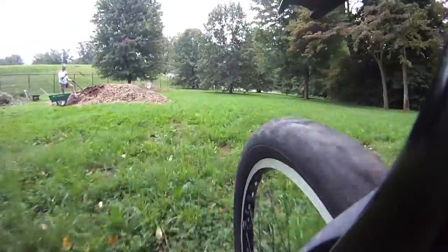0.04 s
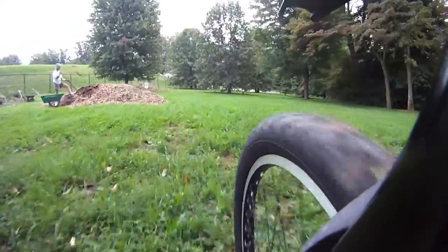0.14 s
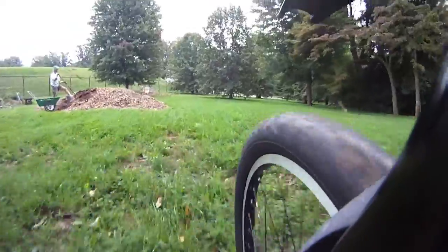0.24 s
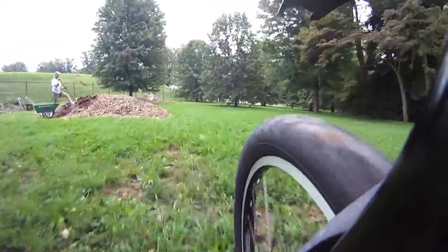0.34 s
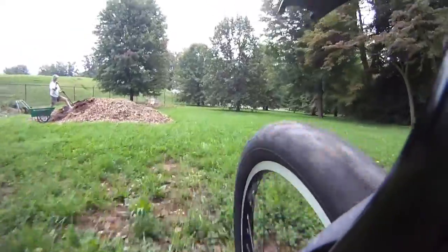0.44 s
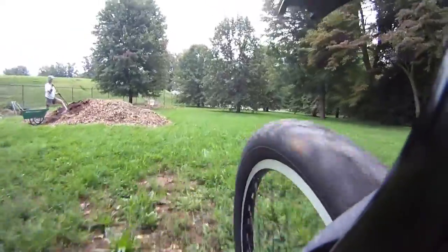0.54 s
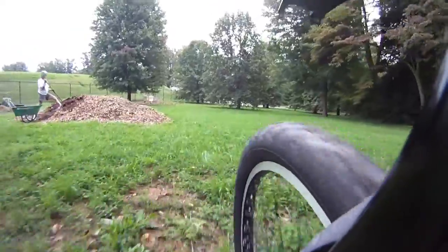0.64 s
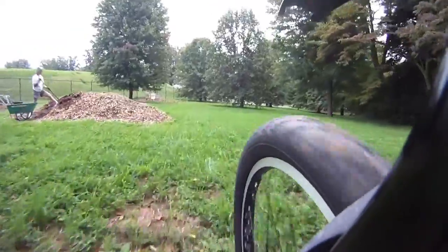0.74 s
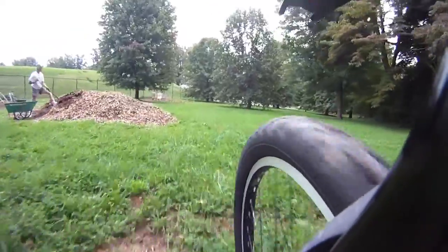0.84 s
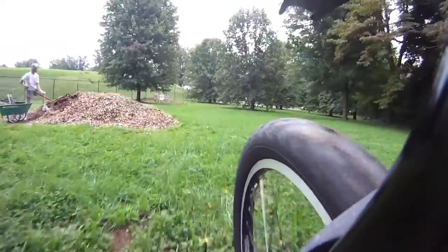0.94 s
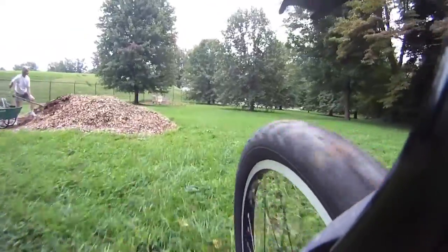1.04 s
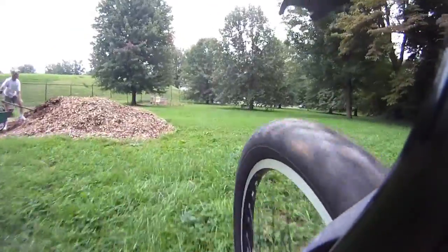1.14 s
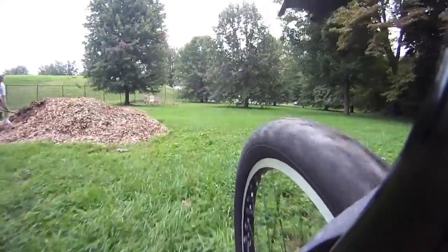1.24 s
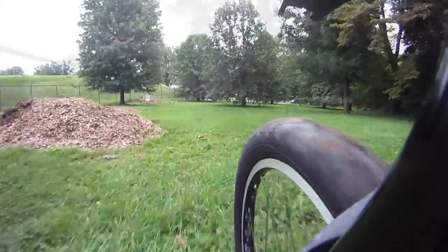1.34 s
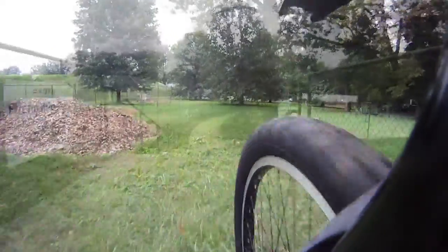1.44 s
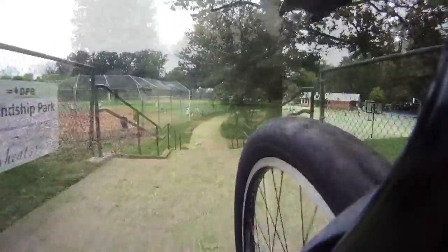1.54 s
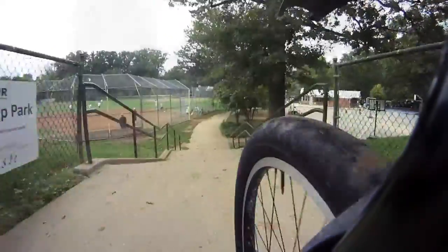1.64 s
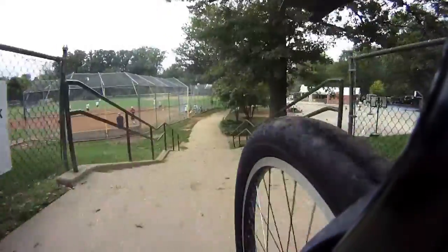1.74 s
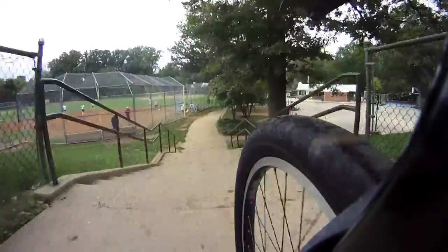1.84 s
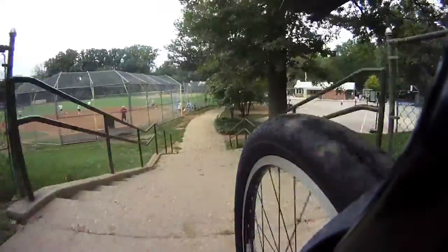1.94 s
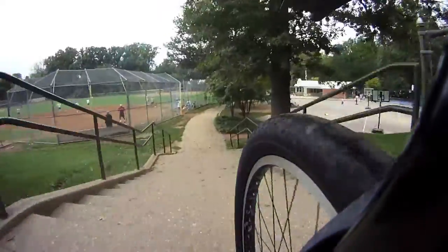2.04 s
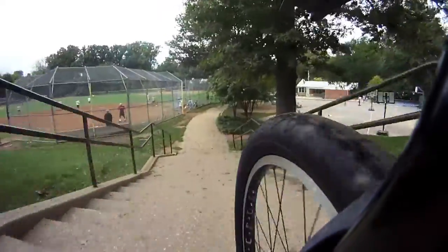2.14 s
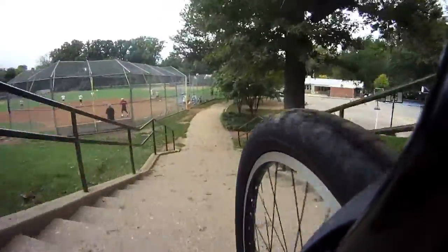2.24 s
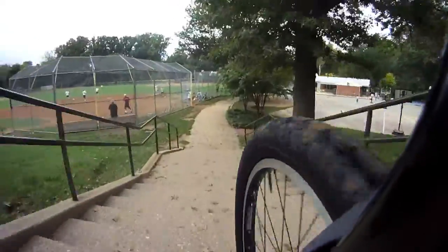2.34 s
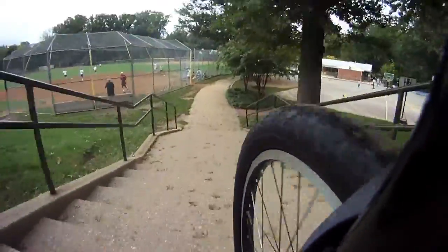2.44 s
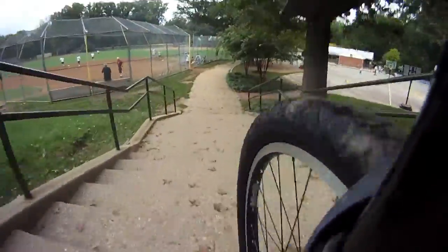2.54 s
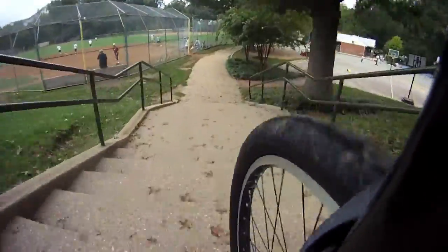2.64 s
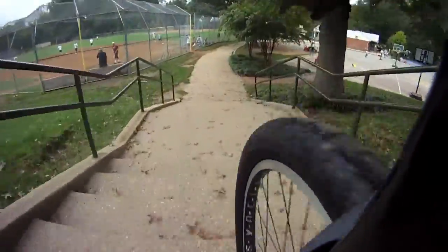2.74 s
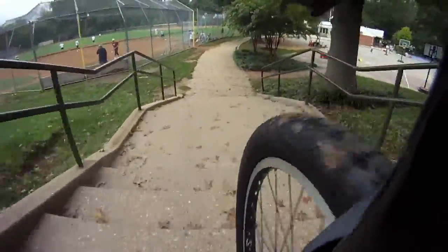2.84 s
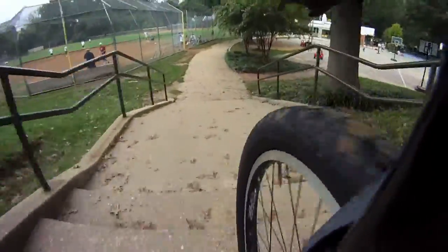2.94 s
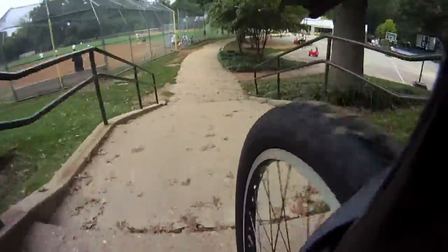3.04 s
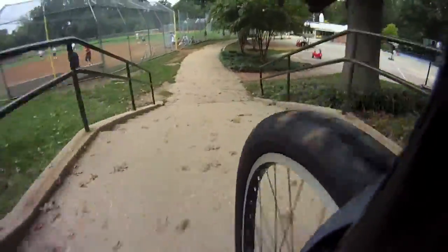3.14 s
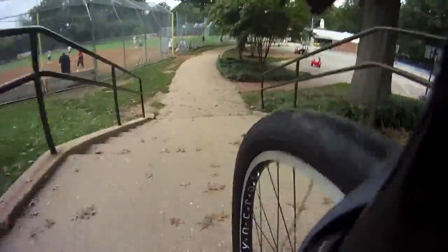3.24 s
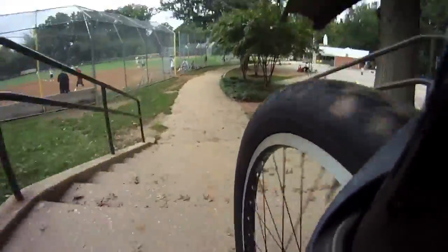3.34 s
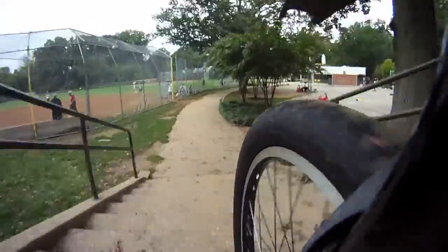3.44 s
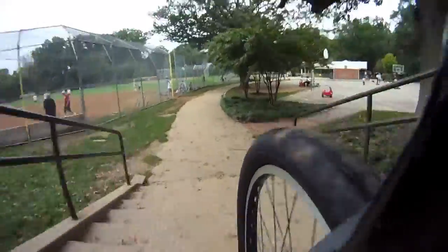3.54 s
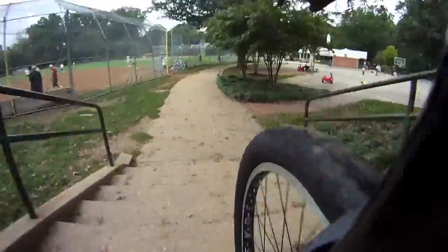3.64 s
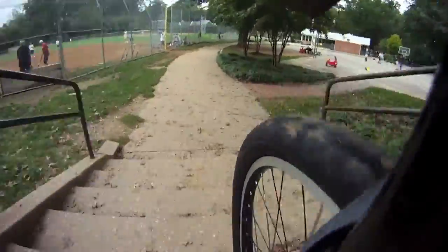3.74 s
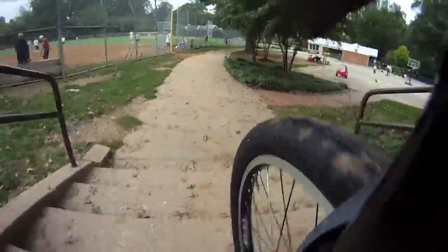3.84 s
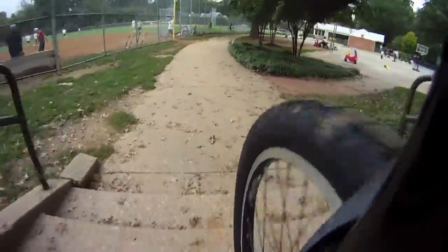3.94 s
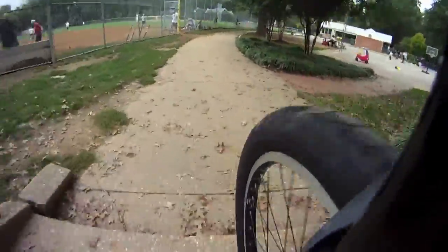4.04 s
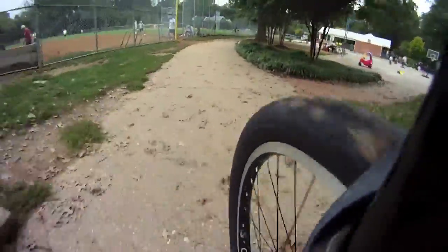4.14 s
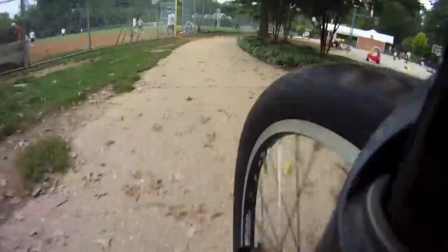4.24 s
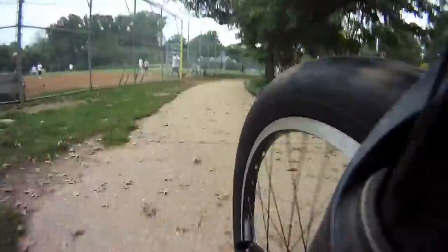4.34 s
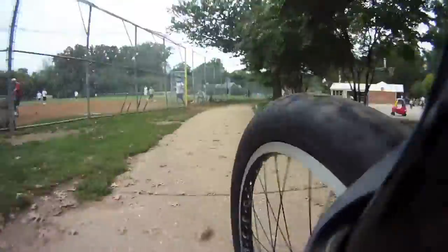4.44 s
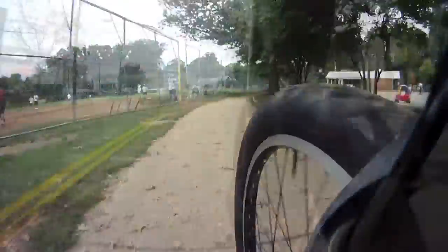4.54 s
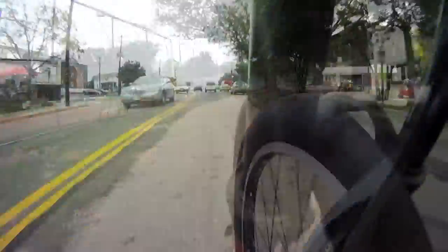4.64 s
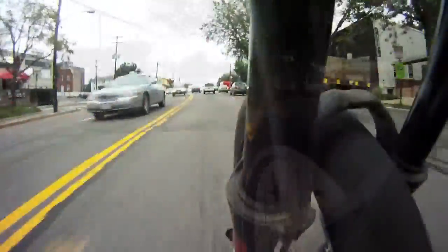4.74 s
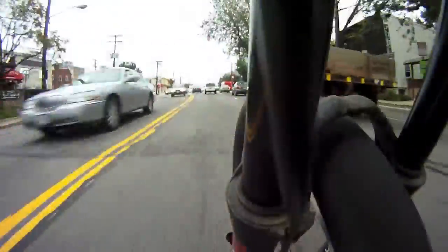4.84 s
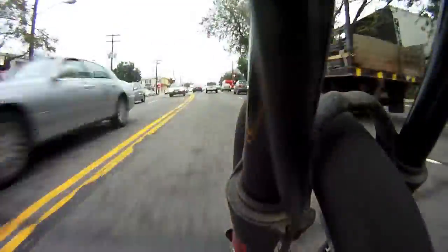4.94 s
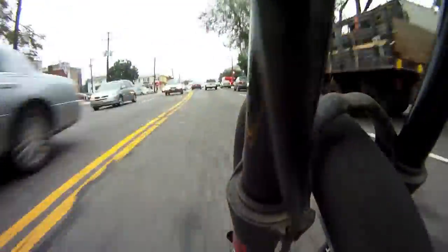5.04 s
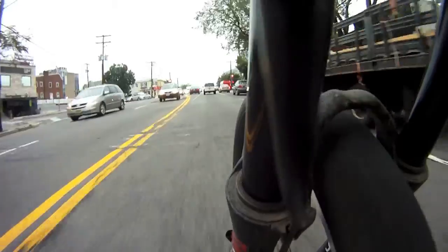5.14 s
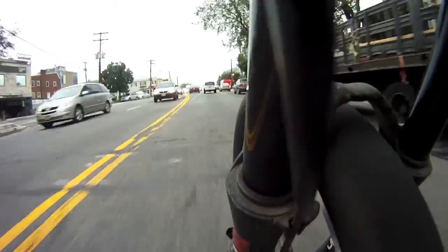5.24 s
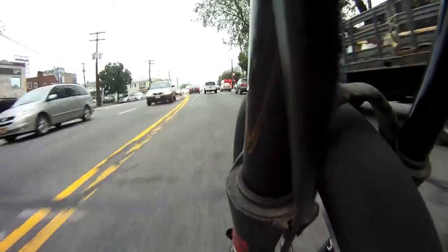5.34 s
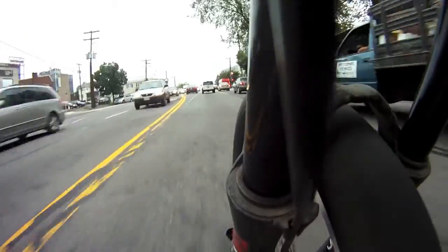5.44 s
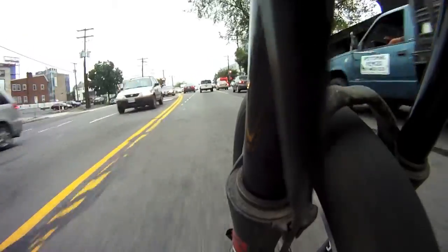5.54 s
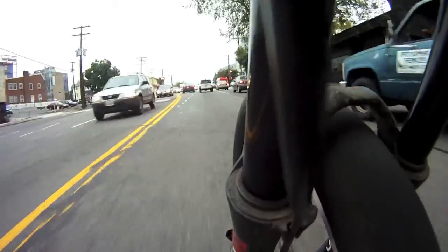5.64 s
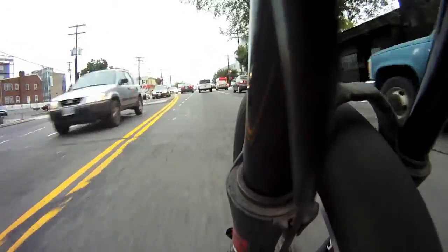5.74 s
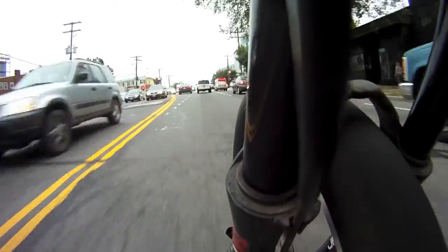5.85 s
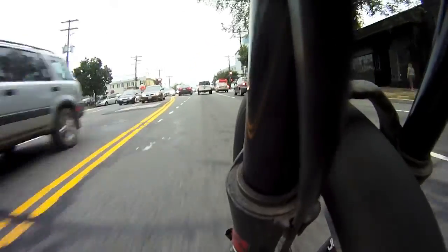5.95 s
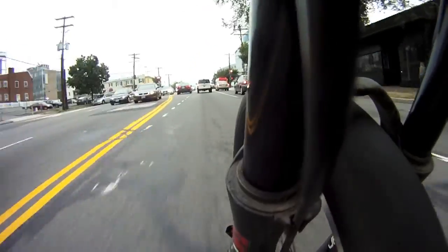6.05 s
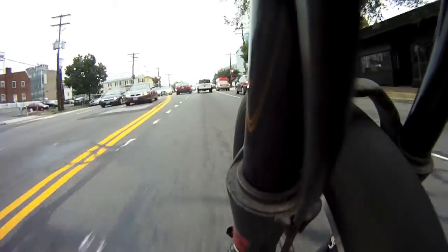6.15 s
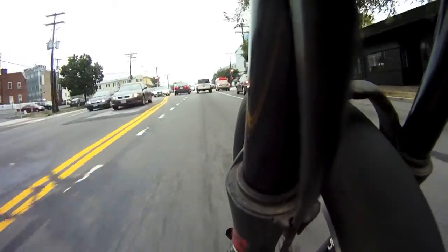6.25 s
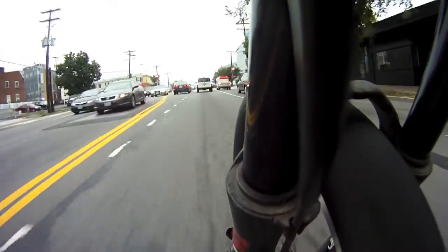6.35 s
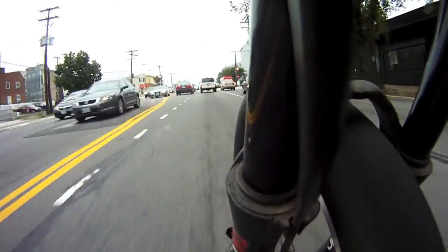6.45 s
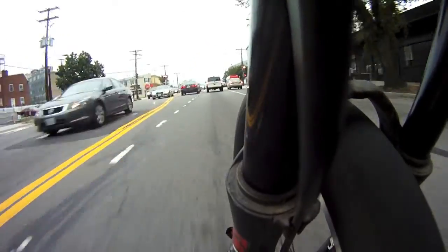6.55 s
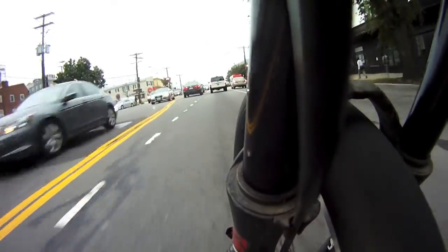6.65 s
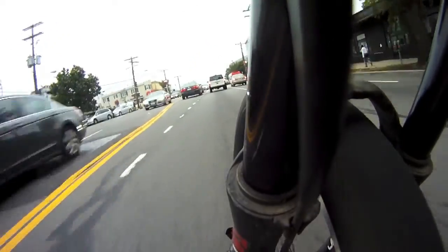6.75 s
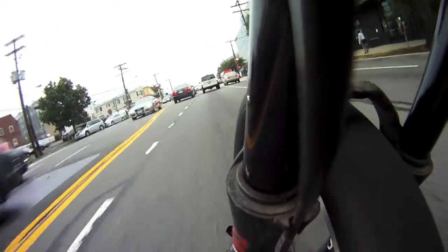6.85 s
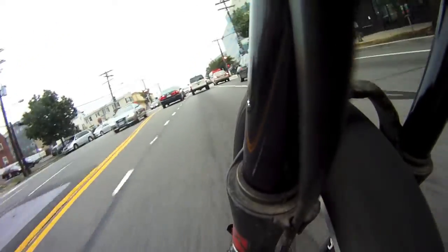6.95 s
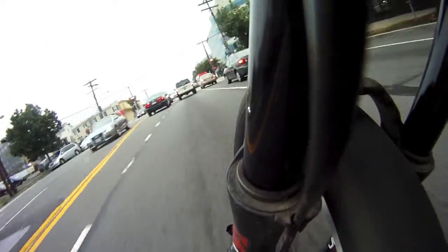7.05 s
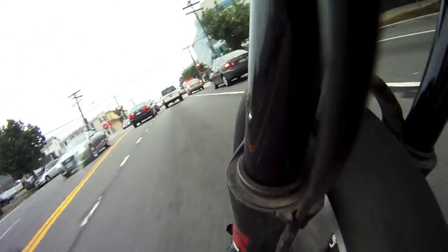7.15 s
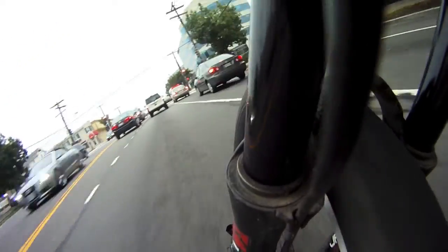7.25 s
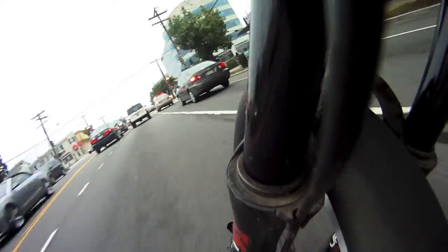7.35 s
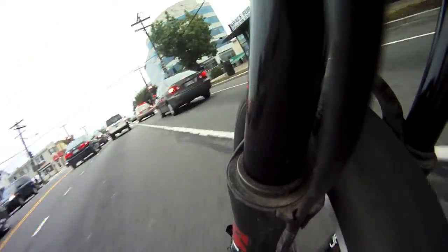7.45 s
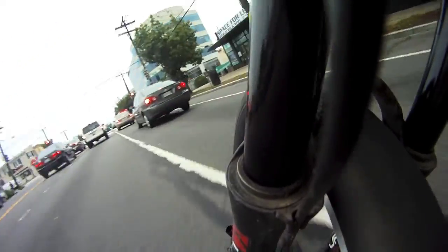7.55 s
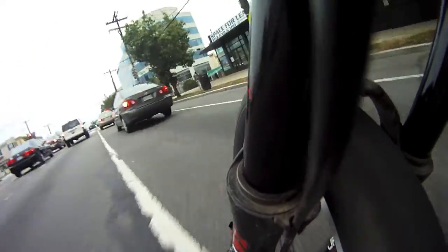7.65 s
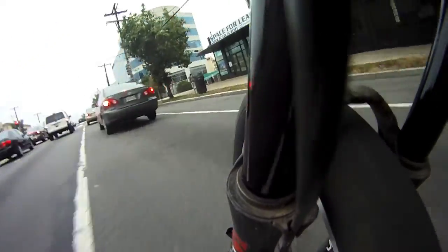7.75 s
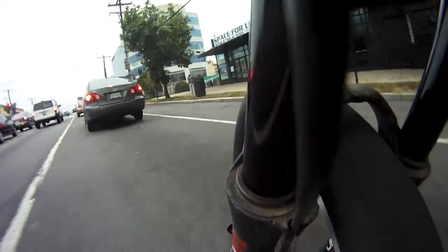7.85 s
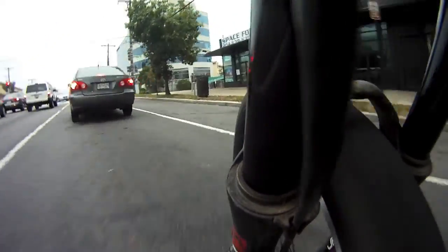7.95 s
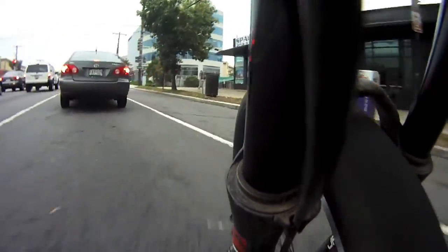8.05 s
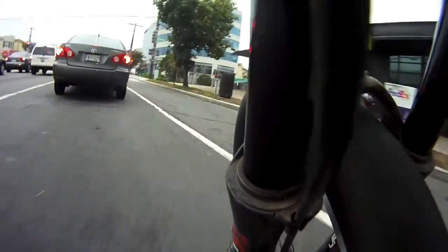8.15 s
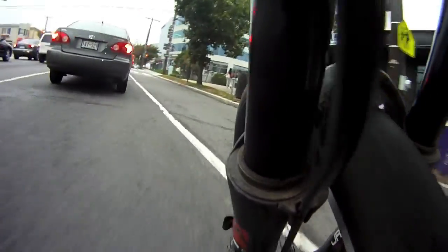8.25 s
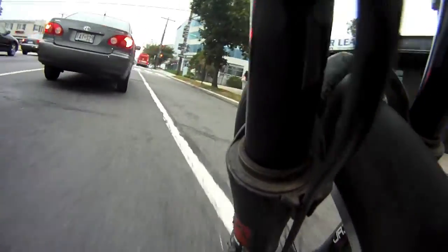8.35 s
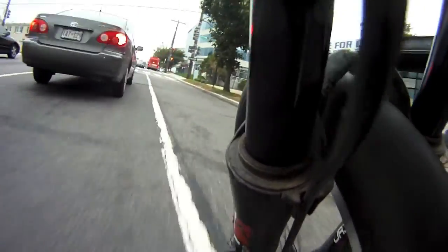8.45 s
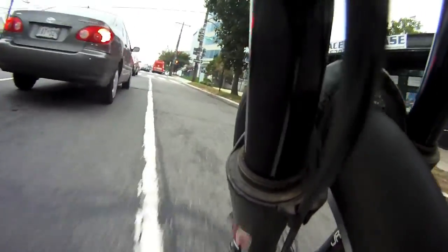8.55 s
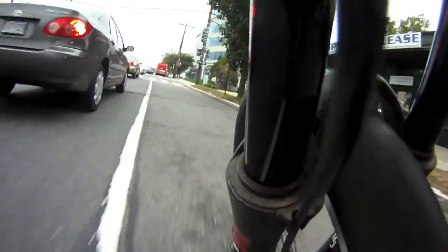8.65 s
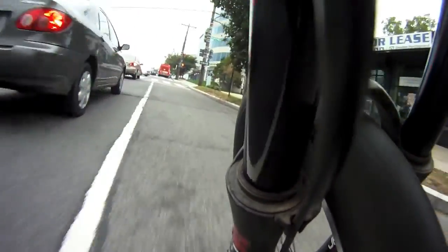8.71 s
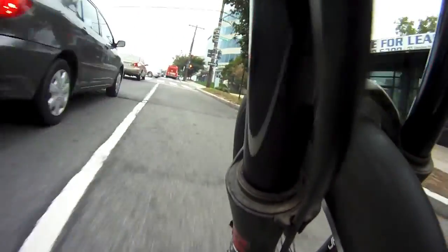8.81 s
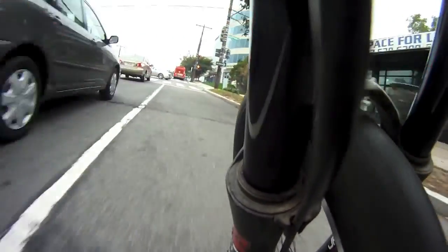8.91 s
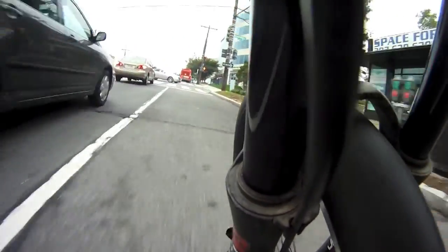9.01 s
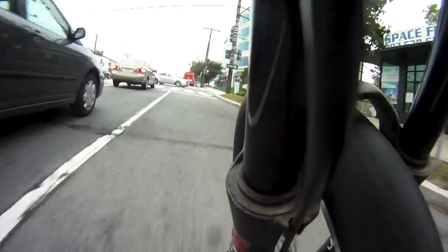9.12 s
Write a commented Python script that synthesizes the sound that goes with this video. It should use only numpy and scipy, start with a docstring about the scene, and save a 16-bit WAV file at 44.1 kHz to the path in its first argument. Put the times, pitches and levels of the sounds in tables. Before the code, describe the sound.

Harsh plastic knocks and hollow clunks over rough ground, a fast rattling descent of steps, then droning tyre hum on a street.

```python
"""A camera on a bicycle fork first rides over bumpy grass: the frame shudders and its plastic housing knocks and squeaks.
From about 2.4 s the wheel drops down concrete steps; each drop squeaks, touches, knocks and bounces back once.
From about 4.6 s asphalt drives the tyre and frame into a steady roar; from 7.8 s a car ahead adds a low, sinking note.
Random noise shakes the resonant parts, short noise bursts make the knocks, and gliding tones make the squeaks.
At the end loud sounds push down the gain, and a slow, overloaded sampler adds a tinny mirrored treble."""
import sys
import numpy as np
from scipy import signal
from scipy.fft import rfft, irfft
from scipy.io import wavfile
from scipy.ndimage import uniform_filter1d

SR = 44100
rng = np.random.default_rng(int(sys.argv[2]) if len(sys.argv) > 2 else 0)


def waveform_to_disk(signal):
    """Save audio, clipped to [-1, 1], as 16-bit WAV at the path in sys.argv[1]."""
    frames = np.transpose(np.atleast_2d(signal))
    scaled = np.clip(frames, -1, 1) * 32767
    samples = np.round(scaled).astype(np.int16)
    wavfile.write(sys.argv[1], SR, samples)


N = 404838
TIME = np.arange(N) / SR

# Levels in all tables are relative; the functions and the final gain control still change them.
# The wheel rides over a hummock or a seam: t/s, frame shudder/dB, jolt/dB
BUMPS = [(0.1, -14, -43), (0.299, -15, -20.5), (0.42, -24, -27.5), (0.59, -10, -38), (0.73, -15, -22),
         (0.958, -18, -21), (1.15, -22, -49), (1.28, -17, -25.5), (1.4, -14.5, -33), (1.48, -20, -28),
         (1.8, -30, -30.5), (1.922, -30, -28.5), (2.14, -31, -38), (2.282, -17, -20.5), (4.42, -14.5, -27),
         (4.478, -16.5, -22), (6.1, -18, -25), (8.8, -17, -33), (9.08, -21, -28)]
# Rolling over grass, then concrete, between the blows: t/s, jolting/dB, mount drone/dB, grit/dB
ROUGH_GROUND = [(0.0, -33.5, -33, -41.5), (0.6, -34.5, -34, -32.5), (0.82, -32, -38, -44),
                (1.05, -35.5, -33.5, -34), (1.42, -42, -40, -36.5), (1.58, -36.5, -40, -41),
                (1.9, -32, -35, -46), (2.15, -35.5, -38, -54), (2.55, -38, -33.5, -25.5),
                (3.4, -42, -34, -34.5), (3.9, -42, -52, -22), (4.48, -44, -37.5, -33),
                (4.55, -44, -36, -40)]
# Resonances of the plastic housing: f/Hz, width/Hz, level/dB
HOUSING = [(744, 920, -6), (1304, 410, -1.5), (1607, 170, -1), (2050, 343, 3.5), (2340, 300, 3.5),
           (2680, 890, -5), (3566, 514, -2), (4280, 110, -7.5), (4690, 2200, -10.5)]
# The wheel drops down one step:
# t/s, level/dB, length/s, treble boost/dB, wind-up/s, squeak/dB, first touch/dB, jolt/dB
STEPS = [(2.4116, -4.5, 0.0053, 3, 0.023, -7, -9.5, -32), (2.4774, -2, 0.0041, 15, 0.012, -34, -32, -32),
         (2.5708, -12.5, 0.0021, -5, 0.034, -17, -12.5, -34),
         (2.7105, -13, 0.0079, 10, 0.031, -26, -14, -39), (2.838, -5.5, 0.005, 10, 0.046, -14.5, -9.5, -28),
         (2.9425, -7, .0037, 17, 0.043, -16, -14, -28), (3.045, -13, 0.0072, 10, 0.033, -21, -35, -34),
         (3.138, -12.5, 0.0099, 4, 0.024, -12, -32, -29), (3.23, -17, 0.013, 2, 0.027, -15, -31, -30),
         (3.3103, -16.5, 0.016, 6, 0.037, -13, -29, -25), (3.4235, -34, 0.0061, -1, 0.022, -49, -54, -32),
         (3.4895, -25, 0.012, 12, 0.018, -38, -40, -40), (3.575, -17, 0.0022, 9, 0.029, -34, -20, -27),
         (3.642, -10.5, 0.0057, 15, 0.056, -14.5, -55, -26), (3.7177, -12.5, 0.007, 14, .031, -9, -17, -26),
         (3.802, -14.5, 0.0019, 17, 0.032, -25, -13, -28), (3.895, -6.5, 0.0009, 11, 0.048, -20, -9, -16.5),
         (3.979, -11.5, 0.0016, 13, .041, -33, -16, -26),
         (4.0614, -8, 0.0026, 15, 0.044, -18, -15.5, -28.5), (4.133, -6.5, 0.0019, 26, .018, -19, -28, -29),
         (4.2087, -15, 0.0065, 33, 0.029, -11, -39, -45), (4.2792, -12.5, .01, 10, 0.027, -13, -34, -40)]
# Rolling on asphalt: t/s, tyre hum/dB, frame drone/dB, tread roar/dB, grit/dB
STREET = [(4.55, -33, -40, -38, -58), (4.65, -37, -28.5, -30.5, -59), (4.8, -30.5, -31.5, -34.5, -46.5),
          (5.0, -21, -22, -25.5, -56.5), (5.3, -18.5, -21.5, -25, -46.5), (5.8, -17.5, -19, -25, -52),
          (6.0, -20, -21.5, -25.5, -55), (6.2, -20, -19, -25, -50), (6.85, -18, -19, -25.5, -50.5),
          (7.35, -19.5, -20.5, -26, -53), (7.65, -19, -21.5, -27.5, -51), (8.2, -19.5, -22.5, -29, -53.5),
          (8.5, -19, -24.5, -27.5, -55.5), (9.18, -20, -21.5, -29, -53.5)]


def from_db(db):
    """Turn decibels into a gain."""
    return 10 ** (np.asarray(db) / 20)


def rms_one(x):
    """Scale a signal to an average strength (rms) of 1."""
    return x / np.sqrt(np.mean(x ** 2) + 1e-20)


def gains(rows):
    """Draw one gain curve per dB column, fading away outside the table's span."""
    times, *columns = np.transpose(rows)
    fade_times = [times[0] - .08, times[0], times[-1], times[-1] + .08]
    fade = np.interp(TIME, fade_times, [0, 1, 1, 0])
    return [fade * from_db(np.interp(TIME, times, column)) for column in columns]


def swells(times, db, half_s):
    """Make a gain that rises and falls smoothly around each moment."""
    t = TIME[::64]   # a coarse time grid is enough for smooth curves
    bells = from_db(db) * np.exp(-((t[:, None] - times) / half_s) ** 2)
    return np.interp(TIME, t, np.sqrt(np.sum(bells ** 2, axis=1)))


def drift(rate):
    """Wander randomly with a spread near 1, never beyond 2, taking `rate` new values a second."""
    knots = rng.standard_normal(4096)
    wander = np.interp(TIME * rate, np.arange(len(knots)), knots)
    return np.clip(rms_one(wander), -2, 2)


def response(resonances, size=32768):
    """Ring of a body after one tap, with the given resonances and an energy of 1."""
    hz = np.arange(size // 2 + 1) * SR / size
    power = sum(from_db(db) ** 2 / (1 + (2 * (hz - centre) / width) ** 4)
                for centre, width, db in resonances)
    # Folding the cepstrum makes the ring start at once, with nothing before the tap.
    cepstrum = irfft(np.log(power + 1e-12) / 2)
    cepstrum[1:size // 2] *= 2
    cepstrum[size // 2 + 1:] = 0
    ring = irfft(np.exp(rfft(cepstrum)))[:size // 2]
    return ring / np.sqrt(np.sum(ring ** 2))


def through(force, ring):
    """Let a force set a body ringing."""
    return signal.fftconvolve(force, ring)[:len(force)]


def driven(resonances):
    """Shake a body with a steady random force; the result has rms 1."""
    ring = response(resonances)
    force = rng.standard_normal(N + len(ring) - 1)
    return rms_one(signal.fftconvolve(force, ring, "valid"))


def evened(x, seconds):
    """Hold the level of a noise nearly steady over the given time."""
    power = uniform_filter1d(x ** 2, int(seconds * SR) + 1)
    return x / np.sqrt(power + 1e-6)


def blows(rows, ring):
    """Strike one body with single blows, each with its own peak level."""
    force = np.zeros(N)
    for at_s, db in rows:
        force[int(at_s * SR)] += from_db(db)
    return through(force, ring / np.max(np.abs(ring)))


def housing_spot(colour_db):
    """Strike the housing at a chance spot, which favours some of its resonances."""
    shades = rng.standard_normal(len(HOUSING))
    shaded = [(hz, width, db + colour_db * shade) for (hz, width, db), shade in zip(HOUSING, shades)]
    return response(shaded, size=4096)


def grit(per_s, spread_db, clump_db, colour_db, count=5):
    """Clumps of tiny contacts strike the housing at a few spots, each with its own colour; rms near 1."""
    born = rng.random(N) < per_s * from_db(clump_db * drift(25)) / SR
    loudness_db = spread_db * np.minimum(rng.exponential(1, N), 3)
    sizes = from_db(loudness_db) * rng.choice([-1, 1], N)
    spot = rng.integers(0, count, N)
    ticks = 0
    for k in range(count):
        ticks = ticks + through(born * sizes * (spot == k), housing_spot(colour_db))
    return evened(ticks, .07)


def frame_shudder():
    """The frame's low resonances shake all the time, and harder over each bump."""
    # Steady shudder, strongest across the landing between the flights: t/s, level/dB
    shudder = [(0.0, -25), (1.3, -18.5), (1.6, -31), (2.3, -28), (2.6, -34), (2.74, -23.5), (2.88, -26.5),
               (3.12, -19), (3.6, -13.5), (3.72, -32), (4.2, -21), (4.8, -29), (5.7, -25.5), (6.3, -26.5),
               (9.18, -25)]
    # Low resonances of the frame: f/Hz, width/Hz, level/dB
    frame_resonances = [(39.1, 14.2, -8), (58, 42, -22.5)]
    bump_s, bump_db, _ = np.transpose(BUMPS)
    steady = gains(shudder)[0] * from_db(2.9 * drift(12))
    strength = np.hypot(steady, swells(bump_s, bump_db, half_s=0.035))
    return from_db(-1.0) * strength * evened(driven(frame_resonances), 0.08)


def rough_ride():
    """Uneven ground jolts the frame, makes the mount drone and crunches; bumps and steps swell all three."""
    # Resonances of the jolted frame: f/Hz, width/Hz, level/dB
    jolt_resonances = [(82, 80, -2.5), (134.5, 115, -10), (270, 223, -18.5)]
    # Resonances of the droning mount: f/Hz, width/Hz, level/dB
    mount_drone = [(734, 99, 0.5), (909, 140, 3.5), (1080, 170, -2), (1610, 1450, -12), (2300, 920, -9.5),
                   (3200, 330, -24.5)]
    jolting, drone, crunch = gains(ROUGH_GROUND)
    bump_s, _, bump_db = np.transpose(BUMPS)
    step_s, *_, step_db = np.transpose(STEPS)

    bumps = swells(bump_s, bump_db, half_s=0.029)
    step_jolts = swells(step_s, step_db, half_s=0.013)
    step_drone = swells(step_s, -28.5, half_s=0.017)
    step_grit = swells(step_s - 0.016, -23.5, half_s=0.016)   # the crunch comes just before the blow
    jolting = np.hypot(jolting, bumps + step_jolts)
    drone = np.hypot(drone, from_db(-6) * bumps + step_drone)
    crunch = np.hypot(crunch, from_db(-4) * bumps + step_grit)

    jolts = from_db(3.0) * jolting * evened(driven(jolt_resonances), 0.046)
    mount = drone * driven(mount_drone) * from_db(3.5 * drift(55))
    crackle = grit(per_s=800, spread_db=5.0, clump_db=5.0, colour_db=5.0, count=8)
    return jolts + mount + from_db(-5.0) * crunch * crackle


def step_squeaks():
    """Each step squeaks upward as the fork loads and downward as it lets go; rows as in slip_squeaks."""
    rows = []
    for at_s, db, _, _, wind_up, squeak_db, _, _ in STEPS:
        up, down = 1 + .1 * rng.uniform(-1, 1, 2)        # chance pitch
        rise, fall = 1 + .4 * rng.uniform(-1, 1, 2)      # chance glide
        loading = (at_s - wind_up, squeak_db, .007, 2080 * up, 38.8 * rise)
        release = (at_s, db - 2, .0045, 1993 * down, -39.5 * fall)
        rows += [loading, release]
    return rows


def squeaks(ring, jitter, overtone_db, rasp_db, grip_db, size=4096):
    """Plastic sticks and slips at a gliding rate: a short, rough stack of harmonics rings the housing."""
    # Slips of plastic on plastic away from the steps:
    # t/s at the centre, level/dB, length/s, f/Hz, glide/(octaves per s)
    slip_squeaks = [(0.057, -16, 0.0029, 2620, 9.5), (1.481, -12, 0.0041, 2700, -29.5),
                    (1.994, -24.5, 0.0059, 2300, 3), (4.35, -19, .0015, 3680, 29),
                    (4.422, -24, 0.0038, 3900, 19), (4.518, -23.5, 0.0089, 2050, -33),
                    (4.573, -23.5, 0.0057, 2750, -15), (4.624, -28, 0.019, 2680, 4)]
    out = np.zeros(N + 2 * size)
    t = (np.arange(size) - size // 2) / SR
    for at_s, db, length, hz, glide in slip_squeaks + step_squeaks():
        wobble = rms_one(uniform_filter1d(rng.standard_normal(size), 40))
        octaves = np.clip(glide * t, -.5, .5)
        pitch = hz * 2 ** octaves * (1 + jitter * wobble)
        phase = 2 * np.pi * np.cumsum(pitch) / SR
        # Leave out harmonics too high for the sample rate.
        overtones = sum(np.sin(k * phase) * (k * pitch < SR / 2) for k in range(2, 8))
        rasp = from_db(rasp_db) * rng.standard_normal(size)
        slips = np.sin(phase) + from_db(overtone_db) * overtones + rasp
        grip_wander = np.interp(t, np.linspace(t[0], t[-1], 40), rng.standard_normal(40))
        grip = from_db(grip_db * grip_wander)
        squeak = through(slips * grip * np.exp(-(t / length) ** 2), ring)
        loudest = np.sqrt(np.max(uniform_filter1d(squeak ** 2, 128)))
        at = int(at_s * SR) + size // 2
        out[at:at + size] += from_db(db) * squeak / loudest
    return out[size:size + N]


def loose_ticks(count=70):
    """Loose parts tick at random, at levels that follow the grit tables; rows as in knock_rows."""
    street_offset_db = 12.5   # asphalt grit is tabled on a lower scale, so its ticks are raised
    grit_db = [(row[0], row[-1]) for row in ROUGH_GROUND[:-1]]
    grit_db += [(row[0], row[-1] + street_offset_db) for row in STREET]
    when, size = rng.random((count, 2)).T
    times = when * TIME[-1]
    ground_db = np.interp(times, *np.transpose(grit_db))
    levels = ground_db + 4 + 4 * np.minimum(-np.log(1 - size), 2)   # most are soft, a few loud
    length_s, bright_db = 0.00081, 2
    return [(at_s, level, length_s, bright_db) for at_s, level in zip(times, levels)]


def step_knocks():
    """At each step the housing touches once, takes the blow and bounces once; rows as in knock_rows."""
    touch_share = 0.62   # share of the wind-up still to go at the first touch
    rows = []
    for at_s, db, length, bright_db, wind_up, _, touch_db, _ in STEPS:
        touch = (at_s - touch_share * wind_up, touch_db, 0.0021, 15)
        blow = (at_s, db, length, bright_db)
        rebound = (at_s + .016 * rng.uniform(1.0, 1.2), db - 16.5, .002, 0)
        rows += [touch, blow, rebound]
    return rows


def chatter(colour_db, attack_share, bright_hz, bounce_db, lead_db, tail_db, tail_s, size=4096):
    """Each knock is a quick swarm of plastic contacts, with a faint buzz as parts close and settle."""
    # Knocks of the housing, from hard slaps to soft gritty patches and rustles:
    # t/s at the centre, level/dB, length/s, treble boost/dB
    knock_rows = [(0.122, -2.5, 0.0036, 0.5), (0.267, -17, 0.0047, -18), (0.4351, -3, 0.0017, -9.5),
                  (0.7576, -1.5, 0.0013, 4), (0.8543, -7, 0.00089, -15), (0.945, -23, 0.01, -5),
                  (0.9897, -3, 0.0017, 0), (1.266, -10, 0.0024, 11), (1.3373, -24, 0.0025, 8),
                  (1.492, -8.5, 0.0024, 7), (1.7357, -18, 0.0014, -6), (1.938, -34, .012, -11),
                  (2.262, -20, 0.0079, -21), (2.2896, -14, 0.015, -25), (2.4273, -7.5, 0.0027, -15),
                  (2.464, 0.5, 0.002, 5), (2.586, -4, 0.0018, 21), (2.599, -1.5, 0.0013, 1),
                  (2.9554, -8.5, .0015, 13), (3.629, -6, 0.0015, 12), (3.7265, -4.5, 0.0014, 18),
                  (3.8146, -0.5, 0.00026, 6), (3.913, -7, .007, 4), (3.9879, -6.5, 0.0012, 10),
                  (3.997, -9, 0.0013, 5), (4.07, -11.5, 0.00095, 20), (4.311, -24.5, .0068, 7),
                  (4.369, -11, .0016, 7), (4.7197, -10, 0.0017, -18), (4.767, -22.5, 0.0022, 6),
                  (4.8013, -17, 0.0031, 7), (5.0362, -14.5, 0.0057, -23), (5.11, -15, 0.0029, -18),
                  (5.132, -14, 0.00068, -15), (5.1716, -10.5, 0.0026, 3), (5.743, -27.5, 0.01, 18),
                  (5.869, -26, 0.0085, 5), (6.104, -12.5, 0.00045, -18), (6.2187, -17, 0.0027, -2),
                  (7.744, -12.5, 0.00088, -22), (7.749, -13, 0.0044, -11), (8.585, -27.5, 0.0066, 2),
                  (8.7363, -21, .0007, -8), (8.7816, -21.5, .0009, -12)]
    out = np.zeros(N + 2 * size)
    lead = size // 3
    t = (np.arange(size) - lead) / SR
    treble = signal.butter(1, bright_hz, "high", fs=SR)
    for at_s, db, length, bright_db in knock_rows + step_knocks() + loose_ticks():
        length = max(length, .0005)
        buzz = from_db(np.where(t > 0, tail_db, lead_db)) * np.exp(-np.abs(t) / tail_s)
        side_length = length * np.where(t < 0, attack_share, 1)
        press = np.exp(-(1.05 * t / side_length) ** 2) + buzz
        # The parts bounce apart every few ms.
        bounce = np.interp(t, np.linspace(t[0], t[-1], 48), rng.standard_normal(48))
        press = press * from_db(bounce_db * np.clip(bounce, -1.5, 1.5))
        knock = through(press * rng.standard_normal(size), housing_spot(colour_db))
        knock = knock + (from_db(bright_db) - 1) * signal.lfilter(*treble, knock)
        energy = from_db(db) ** 2 * (length + .002) * SR   # longer knocks carry more energy
        at = int(at_s * SR) + size - lead
        out[at:at + size] += knock * np.sqrt(energy / np.sum(knock ** 2))
    return out[size:size + N]


def mount_clunks():
    """The mount flexes and rings with a hollow clunk."""
    # Clunks: t/s, peak level/dB
    clunk_rows = [(0.18, -14.5), (0.25, -16.5), (0.401, -24), (0.611, -17), (0.682, -9), (0.711, -15),
                  (0.975, -10), (1.042, -14), (1.182, -19.5), (1.72, -20), (2.255, -6), (2.284, -15),
                  (5.106, -5), (7.787, -14.5)]
    # Resonances of the flexing mount: f/Hz, width/Hz, level/dB
    mount_resonances = [(737, 68, 7), (912, 165, 7.5), (1194, 36, 0)]
    ring = response(mount_resonances + [(2100, 810, -14)])
    return from_db(5) * blows(clunk_rows, ring)


def tyre_thuds():
    """The tyre bottoms out on a bump or a step and gives a low thud."""
    # Thuds: t/s, peak level/dB
    thud_rows = [(0.754, -16), (1.263, -24.5), (2.581, -11), (3.55, -17.5), (3.624, -16.5), (3.811, -18),
                 (3.889, -11), (3.97, -17.5), (4.475, -21), (4.864, -17), (6.079, -12), (8.578, -6)]
    ring = response([(104, 75, -3.0), (288, 410, -12)])   # f/Hz, width/Hz, level/dB
    return from_db(8.0) * blows(thud_rows, ring)


def street_ride():
    """Asphalt grain drives the tyre and frame; the same shaking makes the housing tick."""
    # Resonances of the humming tyre: f/Hz, width/Hz, level/dB
    tyre_hum = [(93.4, 15, -6), (113.4, 10.1, 1.5), (129.8, 12.4, 2), (161, 14, -3.5), (196.5, 26, -5.5),
                (274, 94, -19.5)]
    # Resonances of the droning frame: f/Hz, width/Hz, level/dB
    frame_drone = [(361, 46, -3), (406.2, 43, 0), (448.3, 37.4, -1.5), (516.3, 42.4, -3), (585, 71, -13.5)]
    # Resonances of the roaring tread: f/Hz, width/Hz, level/dB
    tread_roar = [(674, 39, 1.5), (800, 310, 0), (896, 102, 0.5), (1116, 196, 1), (1360, 110, -6),
                  (1680, 440, -21.5), (1913, 470, -6.5), (2223, 163, -4.5), (3440, 500, -27)]
    hum, drone, roar, crunch = gains(STREET)
    patches_per_s = 14   # uneven asphalt makes the tones swell and sink
    hum_swell = from_db(1.46 * drift(patches_per_s))
    drone_swell = from_db(1.34 * drift(patches_per_s))
    roar_swell = from_db(1.1 * drift(40) + .5 * drift(5))

    tyre = from_db(0.9) * hum * evened(driven(tyre_hum), 0.19) * hum_swell
    frame = from_db(0.34) * drone * evened(driven(frame_drone), 0.093) * drone_swell
    tread = from_db(1.0) * roar * driven(tread_roar) * roar_swell
    ticks = grit(per_s=750, spread_db=4.8, clump_db=4.5, colour_db=2.5)
    return tyre + frame + tread + from_db(11.0) * crunch * ticks


def car_ahead():
    """A low, slightly unsteady engine note sinks as the car slows."""
    # Engine of the car just ahead: t/s, f/Hz, level/dB
    engine = [(7.8, 92, -37), (8.0, 88.6, -28), (8.3, 88.8, -20.5), (8.55, 85.2, -25), (8.7, 84, -34)]
    times, hz, db = np.transpose(engine)
    pitch = np.interp(TIME, times, hz) * (1 + 0.017 * drift(15))
    phase = 2 * np.pi * np.cumsum(pitch) / SR
    return gains(np.column_stack([times, db]))[0] * np.sin(phase)


def scene():
    """Add up everything at one microphone, the same in both channels."""
    housing = response(HOUSING, size=4096)
    creaks = squeaks(housing, jitter=.07, overtone_db=-5, rasp_db=1, grip_db=4)
    knocks = from_db(2.0) * chatter(colour_db=2.5, attack_share=1.0, bright_hz=3250, bounce_db=6.5,
                                    lead_db=-19.5, tail_db=-6, tail_s=0.0042)
    ride = frame_shudder() + rough_ride() + creaks + knocks
    ride = ride + mount_clunks() + tyre_thuds() + street_ride() + car_ahead()
    return np.array([ride, ride])


def gain_control(x, threshold_db, recovery_db_per_s, attack_s):
    """Loud sounds push the gain down; it climbs back at a steady rate."""
    level_db = 10 * np.log10(np.abs(uniform_filter1d(x[0] ** 2, 64)) + 1e-9)
    excess_db = np.maximum(level_db - threshold_db, 0)
    # A running maximum on a rising ramp keeps each cut and lets it shrink steadily.
    climb = recovery_db_per_s * TIME
    cut_db = np.maximum.accumulate(excess_db + climb) - climb
    r = np.exp(-1 / (attack_s * SR))
    smooth_cut_db = signal.lfilter([1 - r], [1, -r], cut_db)
    return x * from_db(-smooth_cut_db)


def record(dry):
    """The camera samples slowly, overloads and holds each sample, mirroring the sound into a tinny treble."""
    camera_rate_hz, cutoff_hz = 12000, 15400
    x = gain_control(dry, threshold_db=-8.5, recovery_db_per_s=126, attack_s=0.016)
    x = signal.sosfilt(signal.butter(12, 5600, fs=SR, output="sos"), x)
    x = signal.resample_poly(x, camera_rate_hz, SR, axis=1)
    x = x / (1 + (x / .84) ** 6) ** (1 / 6)   # overload: peaks flatten towards .84
    held = np.repeat(x, 4, axis=1)
    x = signal.resample_poly(held, SR, 4 * camera_rate_hz, axis=1)[:, :N]
    return signal.sosfilt(signal.ellip(10, .3, 80, cutoff_hz, fs=SR, output="sos"), x)


dry = scene()
out = record(dry)
waveform_to_disk(out)
```